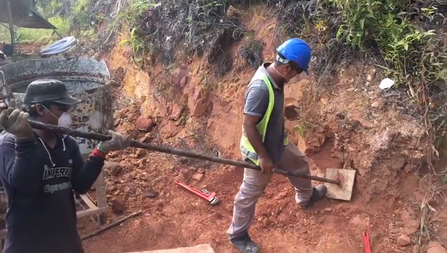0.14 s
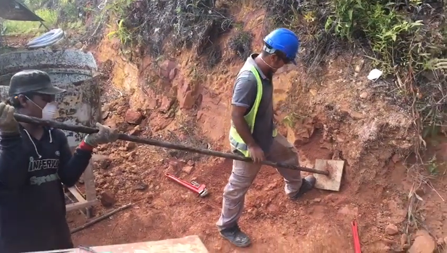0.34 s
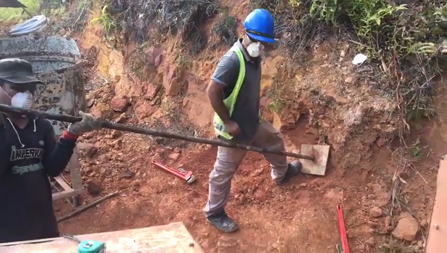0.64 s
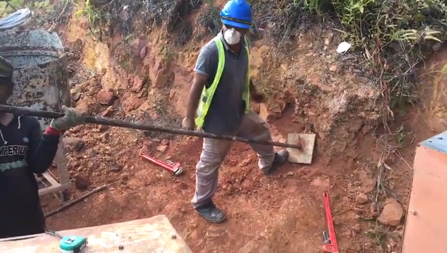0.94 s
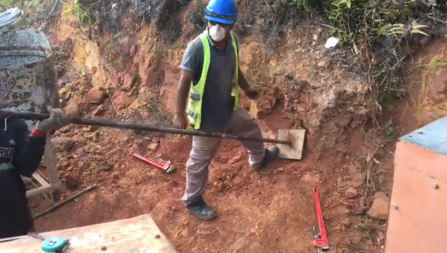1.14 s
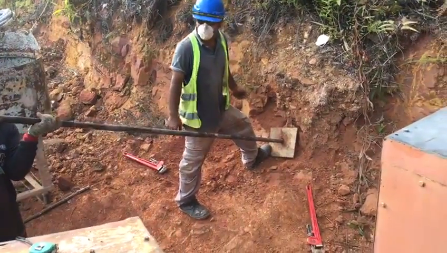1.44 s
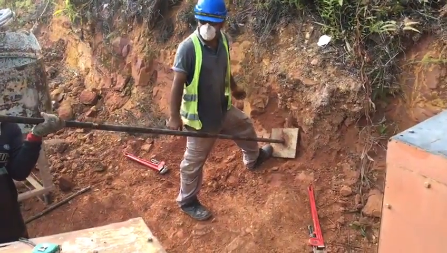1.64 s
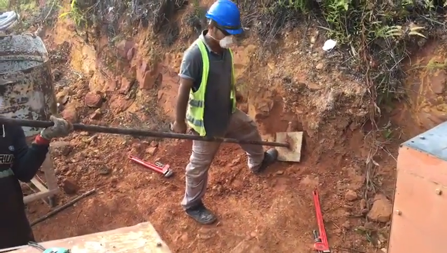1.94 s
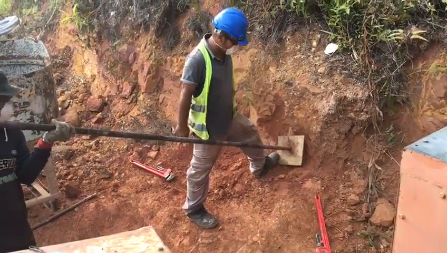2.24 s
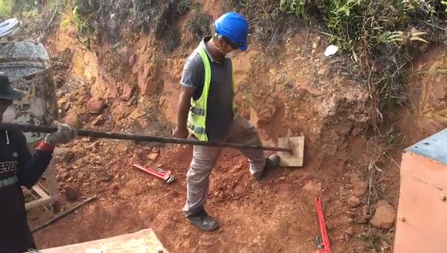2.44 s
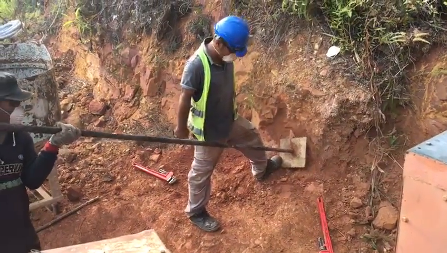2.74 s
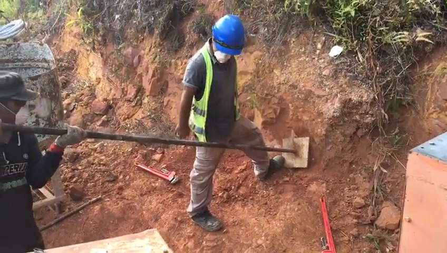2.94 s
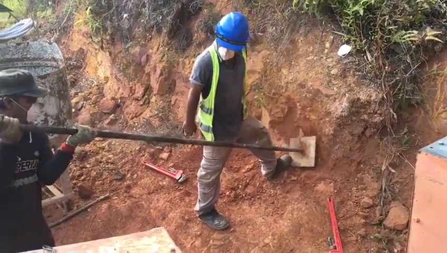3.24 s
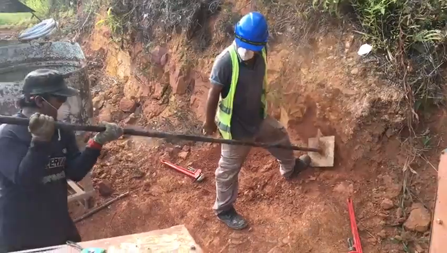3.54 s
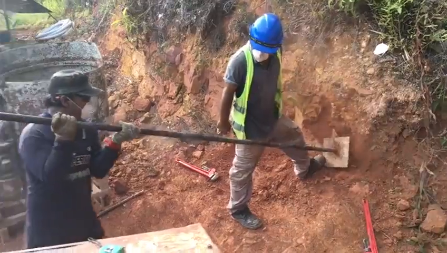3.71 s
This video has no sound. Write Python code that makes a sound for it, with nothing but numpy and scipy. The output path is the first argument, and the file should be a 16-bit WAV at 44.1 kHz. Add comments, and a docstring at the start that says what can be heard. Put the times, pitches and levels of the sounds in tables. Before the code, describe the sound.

A pneumatic hammer driving a rod into earth: first only a low compressor drone and loud air hiss, then rapid thumping, knocking strokes quicken into a harsh rattle, close to the microphone in an outdoor cutting.

```python
"""A compressor drones and compressed air hisses at a building site in a dirt cutting: gliding sines and shaped noise.
Then a pneumatic hammer starts and gathers speed, driving a rod into the slope.
Each stroke is an exhaust thump (a falling tone), a knock (ringing sines) and a lighter return knock,
with a crack and a puff of noise; some strokes bite with a bright rasp of gritty noise.
The drone fades away, and the hiss sinks as the hammer takes the air."""
import sys
import numpy as np
from scipy import signal
from scipy.fft import rfft, irfft
from scipy.io import wavfile

SR = 44100
rng = np.random.default_rng(int(sys.argv[2]) if len(sys.argv) > 2 else 0)


def unload_audio(sound):
    """Save the sound as a 16-bit wav file, at the path given as the first command line argument."""
    columns = np.transpose(np.atleast_2d(sound))
    # keep every value between -1 and 1, then stretch to whole-number steps
    steps = np.round(np.clip(columns, -1, 1) * 32767)
    wavfile.write(sys.argv[1], SR, steps.astype(np.int16))


N = 170667
TIME = np.arange(N) / SR


def from_db(db):
    """Turn decibels into a plain multiplier."""
    return 10 ** (np.asarray(db) / 20)


def rms_one(x):
    """Scale a signal to an average power of 1."""
    return x / np.sqrt(np.mean(x ** 2) + 1e-20)


def in_time(rows):
    """Draw straight lines between the rows, giving each column a value at every sample."""
    seconds, *columns = np.transpose(rows)
    return [np.interp(TIME, seconds, column) for column in columns]


def noise(colour):
    """Make noise of power 1 with the given spectrum, falling away beyond its ends."""
    hz, db = np.transpose(colour)
    log_hz = np.log(np.maximum(np.arange(N // 2 + 1) * SR / N, 1))
    below = np.maximum(np.log(hz[0]) - log_hz, 0)
    above = np.maximum(log_hz - np.log(hz[-1]), 0)
    shape_db = np.interp(log_hz, np.log(hz), db) - 20 * (below + above)
    white = rfft(rng.standard_normal(N))
    return rms_one(irfft(white * from_db(shape_db), N))


def drift(hz):
    """Wander at random with a spread of 1, mostly slower than the given rate."""
    low_pass = signal.butter(2, hz, fs=SR, output="sos")
    wander = signal.sosfilt(low_pass, rng.standard_normal(N + SR))
    return rms_one(wander[SR:])  # the first second lets the filter settle


def clicks(s, db):
    """Place a one-sample click at each time."""
    out = np.zeros(N)
    inside = s < (N - 1) / SR
    out[(s[inside] * SR).astype(int)] = from_db(db)[inside]
    return out + 1e-18  # keeps the filters away from extremely small numbers


def ring(x, hz, t60):
    """Let clicks strike a resonance: a unit click starts a sine of height 1, down 60 dB after t60 seconds."""
    radius = from_db(-60 / (t60 * SR))
    angle = 2 * np.pi * hz / SR
    return signal.lfilter([0, np.sin(angle)], [1, -2 * radius * np.cos(angle), radius * radius], x)


def swell(x, rise_s, decay_s):
    """Turn clicks into envelopes that rise and die away; a slow rise also lowers the peak."""
    up, down = np.exp(-1 / (rise_s * SR)), np.exp(-1 / (decay_s * SR))
    dying = signal.lfilter([1], [1, -down], x)
    return signal.lfilter([1 - up], [1, -up], dying)


def high_pass(x, hz):
    """Remove the lows."""
    return signal.sosfilt(signal.butter(2, hz, "high", fs=SR, output="sos"), x)


def compressor():
    """A nearly pure drone that climbs and fades, with a faint tone sinking below it."""
    # main tone: time_s, pitch_hz, level_db
    drone_curve = [(0, 66.1, -16.5), (.4, 67.6, -16), (.56, 69.7, -16), (.86, 70.3, -15.5),
                   (.95, 74.6, -18), (1.13, 75, -20.5), (1.28, 78.3, -21.5), (1.35, 77.5, -23),
                   (1.5, 79, -27), (1.7, 80, -70)]
    # fainter low tone: time_s, pitch_hz, level_db
    undertone_curve = [(.7, 61.4, -60), (1.0, 55.2, -35), (1.2, 47, -32), (1.45, 40.4, -31),
                       (1.6, 38.7, -60)]
    overtone_db = -39  # relative to the main tone
    hz, db = in_time(drone_curve)
    phase = 2 * np.pi * np.cumsum(hz) / SR
    drone = from_db(db) * (np.sin(phase) + from_db(overtone_db) * np.sin(2 * phase))
    low_hz, low_db = in_time(undertone_curve)
    undertone = from_db(low_db) * np.sin(2 * np.pi * np.cumsum(low_hz) / SR)
    return np.sqrt(2) * (drone + undertone)  # makes the levels average rather than peak levels


def air():
    """A smooth jet of escaping air: noise whose colour wanders a little, band by band."""
    # loudness of the hiss: time_s, level_db
    air_curve = [(0, -15.5), (.3, -15), (.7, -15.5), (1.3, -16), (1.62, -14.5), (1.72, -18.5),
                 (1.92, -17.5), (2.2, -18.5), (2.7, -21.5), (3.2, -22.5), (3.87, -23.5)]
    # spectrum of the hiss: pitch_hz, relative_level_db (per Hz)
    air_colour = [(60, -1), (130, -7), (180, -11), (240, -19), (330, -11.5), (430, -15), (520, -8.5),
                  (680, -11), (900, -3.5), (1100, -6), (1400, -5.5), (1800, -3.5), (2150, -3.5),
                  (2900, -10.5), (3400, -4), (3900, -1.5), (4400, -4), (4850, -6), (5350, -2.5), (5900, -4),
                  (6450, -4), (7000, -6.5), (7600, -8), (8500, -4.5), (9350, -3.5), (10200, -11)]
    patch_db, patch_hz = 1.5, 2.3  # spread and fastest rate of each band's wandering
    flutter_db, flutter_hz = 0.63, 25  # the same for the whole hiss
    db, = in_time(air_curve)
    spectrum = rfft(noise(air_colour))
    band = np.arange(len(spectrum)) * SR / N // 900  # bands 900 Hz wide
    jet = 0
    for k in range(12):
        one_band = irfft(spectrum * (band == k), N)
        jet = jet + one_band * from_db(patch_db * drift(patch_hz))
    return from_db(db + flutter_db * drift(flutter_hz)) * jet


def strokes():
    """Count up the speed to time every stroke and its return, and tell how far it is below full speed."""
    # hammer speed: time_s, strokes_per_s
    speed_curve = [(1.3736, 19.6385), (1.55, 23.7762), (1.72, 24.2236), (2.0, 26.2373), (2.25, 27.8785),
                   (2.5, 29.4617), (2.7, 29.9737), (2.95, 31.1795), (3.3, 31.5553), (3.87, 31.9505)]
    start_s, full_speed = 1.3215, 31.5  # full speed in strokes per second
    return_share, share_per_slowness = .385, 0.01156  # place in the cycle, later when slow
    return_jitter_s = 0.00055
    speed, = in_time(speed_curve)
    turns = np.cumsum(speed * (TIME >= start_s)) / SR
    at = np.searchsorted(turns, np.arange(int(turns[-1]) + 1), side="right")
    s = at / SR
    slow = full_speed - speed[at]
    back = s + (return_share + share_per_slowness * slow) / speed[at]
    back = back + return_jitter_s * rng.standard_normal(len(s))
    return s, back, slow


def exhaust(s, slow):
    """A crack and a puff of air with every stroke: bursts of bright noise, the crack weaker when slow."""
    # spectrum of crack and puff: pitch_hz, relative_level_db (per Hz)
    bright_colour = [(820, -34), (1400, -11), (1550, 0), (1740, -6), (2030, -8.5), (2380, -0.5),
                     (2720, -2.5), (3080, 1.5), (3640, -4.5), (4410, -2), (4830, -11), (5800, 1),
                     (6570, -1.5), (8570, -5.5), (10200, -9.5), (13300, -29), (22000, -120)]
    # click levels, before the rise lowers them; the crack's loss is per stroke/s below full speed
    crack_db, crack_loss_db, puff_db = -11, 0.7, -19.5
    crack = swell(clicks(s, crack_db - crack_loss_db * slow), rise_s=0.00017, decay_s=0.002)
    puff_level = puff_db + rng.standard_normal(len(s))
    puff = swell(clicks(s, puff_level), rise_s=0.0041, decay_s=0.014)
    return np.hypot(crack, puff) * noise(bright_colour)


def bites():
    """A gritty metallic rasp where strokes bite: noise that rises fast, holds and dies."""
    # biting strokes: start_s, level_db (before the lift below), length_s
    bite_rows = [(1.511, -13, .008), (1.56, -17.5, 0.017), (1.598, -14.5, 0.015), (1.640, -14, 0.025),
                 (1.683, -16, 0.018), (1.728, -20, .012), (1.764, -13, 0.0067), (1.809, -16, 0.01),
                 (1.848, -17.5, 0.015), (1.885, -20, 0.035), (1.918, -18.5, .018), (1.962, -14.5, 0.011),
                 (2.005, -16.5, 0.0094), (2.039, -17.5, 0.018), (2.116, -19.5, 0.022), (2.221, -11, 0.0095),
                 (2.327, -14.5, 0.016), (2.402, -15, 0.014), (2.465, -18.5, .02), (2.534, -18.5, 0.04),
                 (2.605, -17.5, 0.021), (2.673, -19.5, 0.024), (2.74, -15, 0.013), (2.805, -14, 0.014),
                 (2.894, -18, 0.039), (2.961, -20, 0.032), (3.027, -20, 0.0085), (3.094, -12.5, 0.0073),
                 (3.156, -17.5, 0.022), (3.252, -17, 0.015), (3.317, -19.5, 0.018), (3.443, -16.5, 0.021),
                 (3.501, -18, 0.027), (3.598, -17, 0.02), (3.663, -16, 0.014), (3.793, -19, .018),
                 (3.852, -16.5, 0.017)]
    # spectrum of the rasp: pitch_hz, relative_level_db (per Hz)
    bite_colour = [(1100, -16), (1700, 1.5), (2400, 2), (2850, -2), (3400, 1.5), (4000, 2), (4450, -3),
                   (4900, -1), (5400, 1.5), (5800, 6.5), (6400, 0), (7300, -2), (8300, 0), (9200, -2.5),
                   (10200, -6)]
    lift_db, grit_db = 3, 3  # grit is the spread of a fast random flicker
    level = 0
    for s, db, length in bite_rows:
        age = np.maximum(TIME - s, 0)
        rise = 1 - np.exp(-age / 0.00074)
        level = level + from_db(db + lift_db) * rise * np.exp(-(age / length) ** 2)
    return level * from_db(grit_db * drift(hz=500)) * noise(bite_colour)


def thump(s, db):
    """Exhaust thumps: short bursts of low tone that fall in pitch, each a little different."""
    end_hz, sweep_hz, sweep_s = 105, 187, 0.0041  # starts sweep_hz above end_hz
    rise_s, length_s = 0.0015, 0.014
    scatter_db, pitch_scatter = 0.54, 0.0067  # pitch scatter as a share of the pitch
    out = np.zeros(N + SR)
    age = np.arange(SR // 20) / SR
    turns = end_hz * age + sweep_hz * sweep_s * (1 - np.exp(-age / sweep_s))
    shape = (1 - np.exp(-age / rise_s)) * np.exp(-(age / length_s) ** 2)
    chance = rng.standard_normal((len(s), 2))
    for start, level, (louder, higher) in zip((s * SR).astype(int), db, chance):
        tone = np.sin(2 * np.pi * turns * (1 + pitch_scatter * higher))
        out[start:start + len(age)] -= from_db(level + scatter_db * louder) * shape * tone
    return out[:N]


def thumps(s, back, slow):
    """Stroke and return each thump; on each stroke the housing booms and the ground shakes."""
    # boom of the housing: pitch_hz, level_db, t60_s, loss_db (per stroke/s below full speed)
    boom_rows = [(87, -17.5, 0.11, 1.5), (158.5, -26.5, 0.24, 0.4), (230, -24.5, 0.088, -0.1),
                 (310, -24, 0.043, -0.5)]
    # rumble of the shaken ground: pitch_hz, relative_level_db (per Hz)
    rumble_colour = [(25, -14), (45, -7), (75, 2.5), (115, -8.5), (170, -7), (260, -4), (350, -16.5)]
    thump_db, return_db, rumble_db = -12.5, -5, -29  # the return is relative to its stroke
    slow_gain_db, return_slow_gain_db = 0.23, 0.1  # gain per stroke/s below full speed
    first_db, build_s = -17, 0.035  # the first strokes are weak
    db = first_db * np.exp((s[0] - s) / build_s) + slow_gain_db * slow
    stroke = thump(s, thump_db + db)
    returning = thump(back, thump_db + db + return_db + return_slow_gain_db * slow)
    boom = 0
    for hz, level, t60, loss in boom_rows:
        boom = boom + ring(clicks(s, db + level - loss * slow), hz, t60)
    shake = swell(clicks(s, db), rise_s=0.014, decay_s=0.032)
    rumble = from_db(rumble_db) * shake * noise(rumble_colour)
    return stroke + returning - boom + rumble


def knocks(s, back, slow):
    """Blow and lighter return ring the casing and rod, building up, and scatter off the slope as noise."""
    # ringing of casing and rod: pitch_hz, level_db, t60_s, loss_db (per stroke/s below full speed)
    knock_rows = [(443, -24, 0.035, 0.1), (609, -24.5, 0.075, -1), (685, -11.5, .018, 0.15),
                  (935, -15, .03, 0.3), (1036, -11, .02, 2.5), (1280, -21.5, 0.024, 3.5),
                  (1723, -24, .04, -1), (2410, -29, 0.033, -2), (3100, -26.5, 0.02, -2),
                  (3950, -31, .022, -4)]
    # scatter off the cutting: pitch_hz, relative_level_db (per Hz)
    scatter_colour = [(300, -9), (380, -7.5), (600, -8.5), (780, -5), (1000, -9.5), (1250, -7),
                      (1500, -30.5), (2500, -22)]
    first_db, build_s = -10.5, 0.3  # the knocks build up after the start
    return_db, chance_db, lag_s = -5, 2.5, .0004
    slow_limit = 4.1  # strokes/s below full speed, beyond which the knock keeps its colour
    scatter_db, scatter_slow_gain_db = -22, 0.55  # gain per stroke/s below full speed
    build = first_db * np.exp((s[0] - s) / build_s)
    return_build = build + return_db + chance_db * rng.standard_normal(len(s))
    db = np.r_[build, return_build]
    hits = np.r_[s, back] + lag_s
    slow = np.minimum(np.r_[slow, slow], slow_limit)
    ringing = 0
    for hz, level, t60, loss in knock_rows:
        hit_db = db + level - loss * slow + chance_db * rng.standard_normal(len(hits))
        ringing = ringing + ring(clicks(hits, hit_db), hz, t60)
    scatter_clicks = clicks(hits, scatter_db + db + scatter_slow_gain_db * slow)
    scatter = swell(scatter_clicks, rise_s=0.00017, decay_s=.014)
    return high_pass(ringing, hz=373) + scatter * noise(scatter_colour)


def hollow(x):
    """Cut a narrow dip in the low mids, between thump and knock."""
    return signal.lfilter(*signal.iirnotch(361.7, Q=5.3, fs=SR), x)


def scene():
    """Add compressor, air and hammer at one microphone."""
    s, back, slow = strokes()
    body = hollow(thumps(s, back, slow) + knocks(s, back, slow))
    hammer = body + exhaust(s, slow) + bites()
    return (compressor() + air() + hammer)[None]


def record(dry):
    """The deepest bass is lost, peaks are rounded under full scale and the top is cut."""
    overload, cutoff_hz = .95, 10350  # overload is the ceiling of the rounding, full scale being 1
    x = high_pass(dry, hz=40)
    rounded = x / (1 + (x / overload) ** 4) ** (1 / 4)
    top_cut = signal.ellip(12, .2, 80, cutoff_hz, fs=SR, output="sos")
    return signal.sosfilt(top_cut, rounded)


dry = scene()
out = record(dry)
unload_audio(out)
```